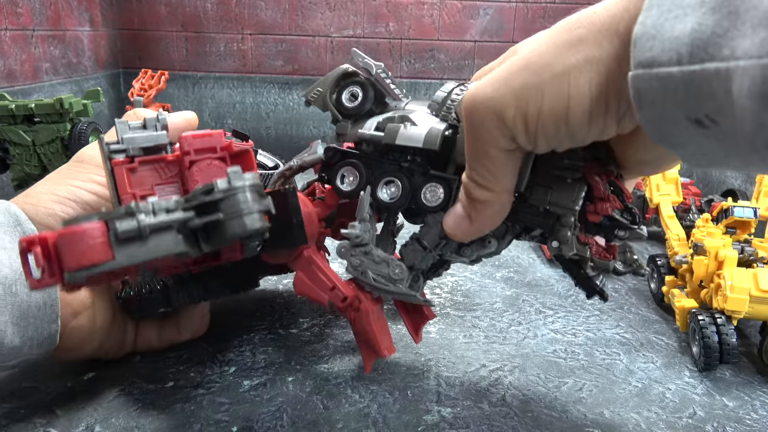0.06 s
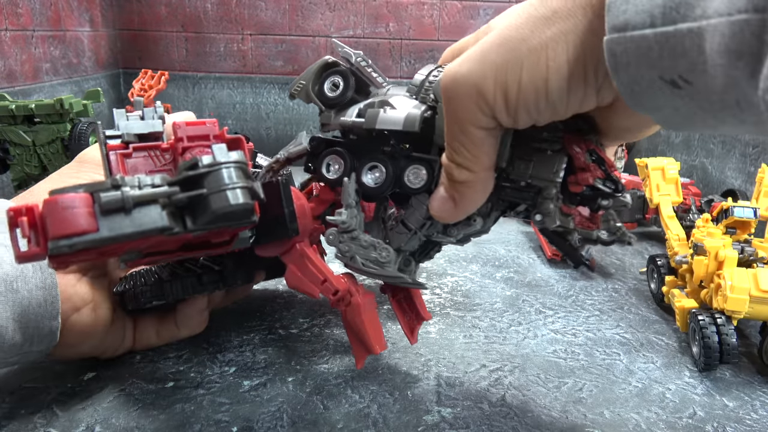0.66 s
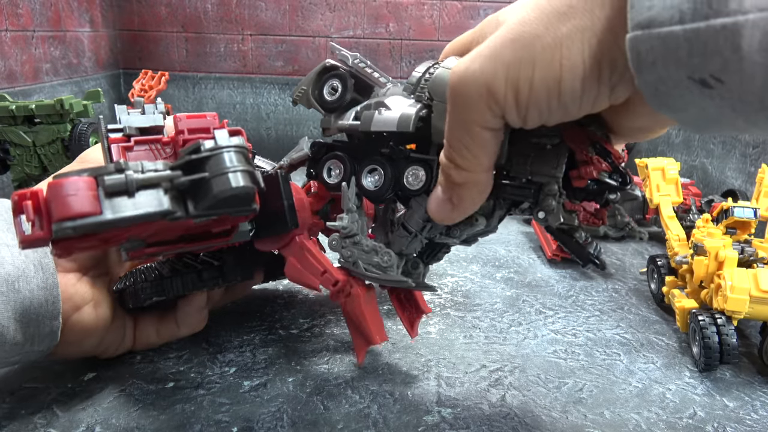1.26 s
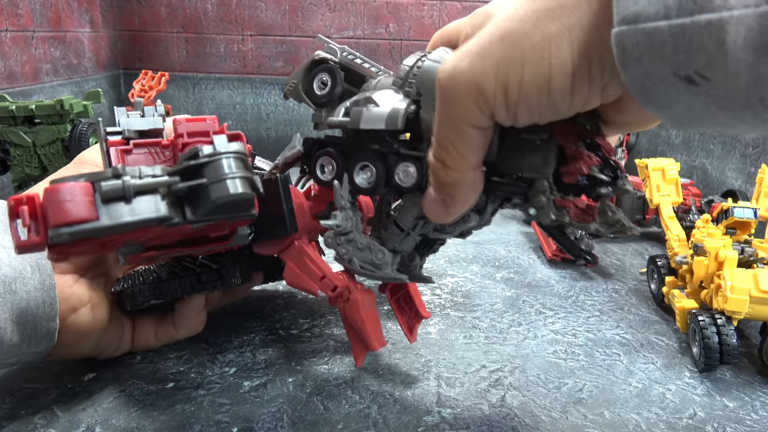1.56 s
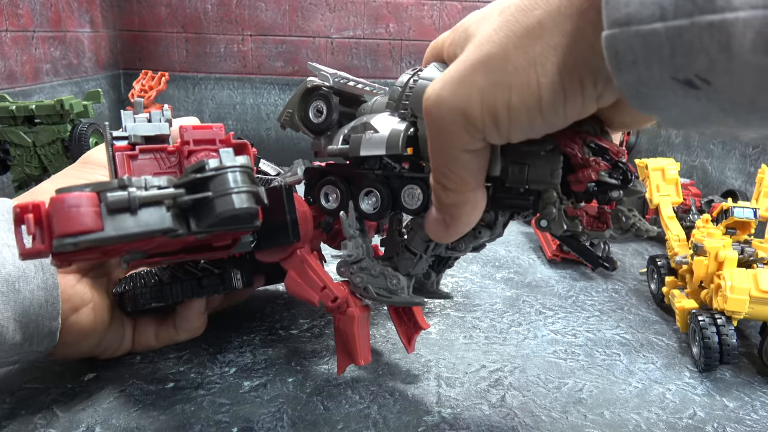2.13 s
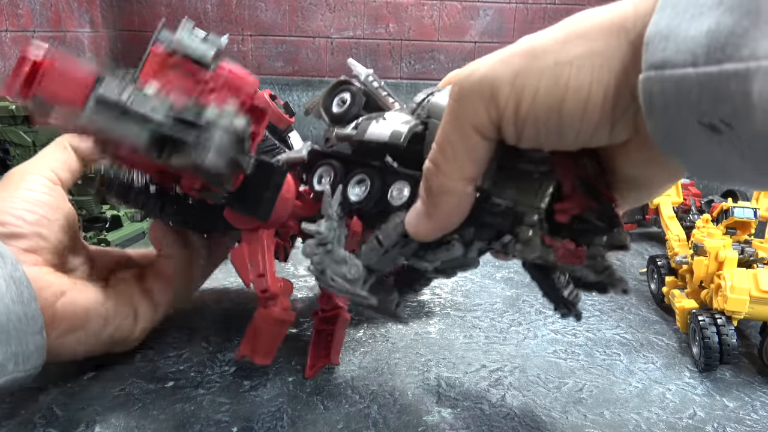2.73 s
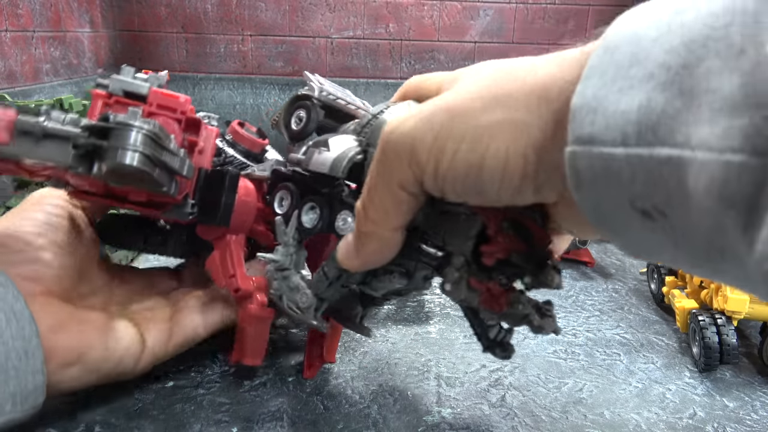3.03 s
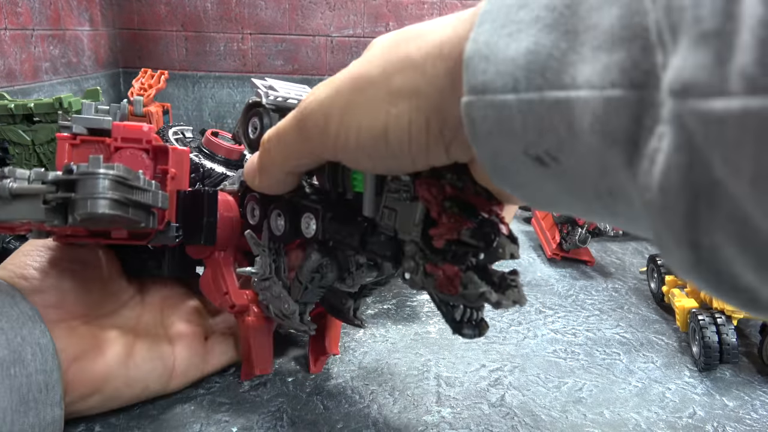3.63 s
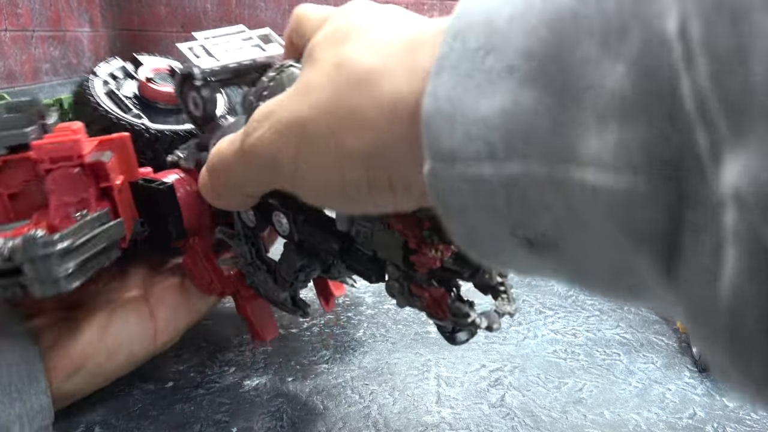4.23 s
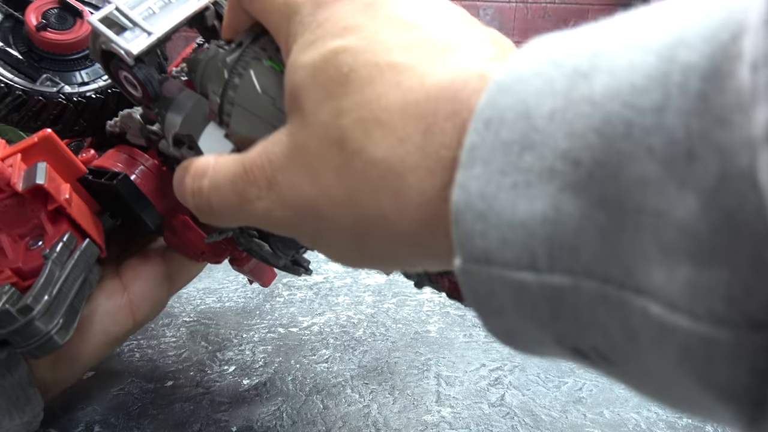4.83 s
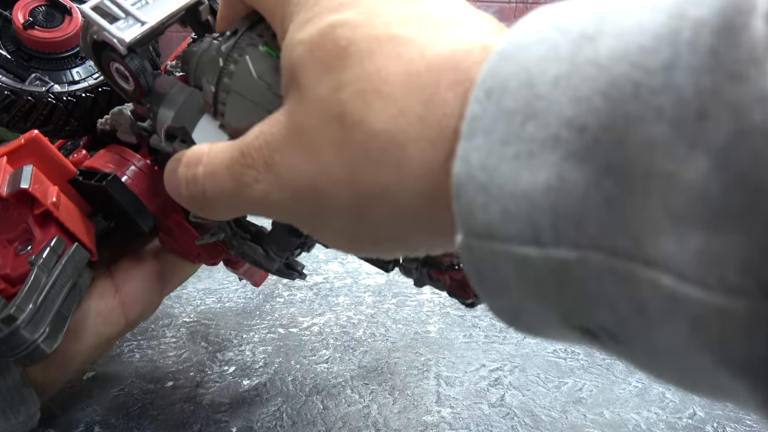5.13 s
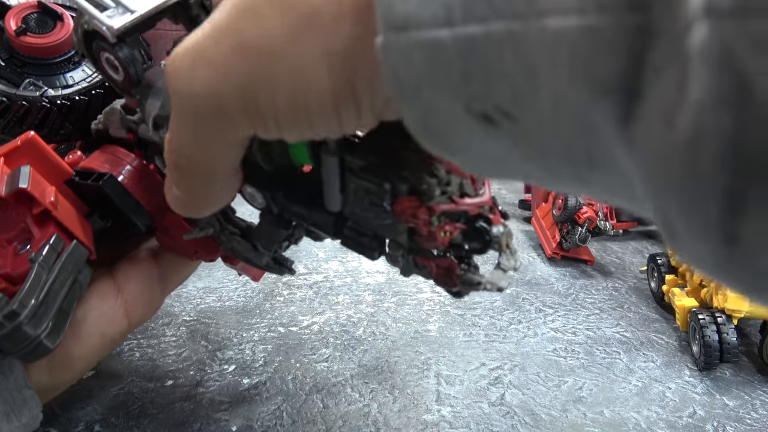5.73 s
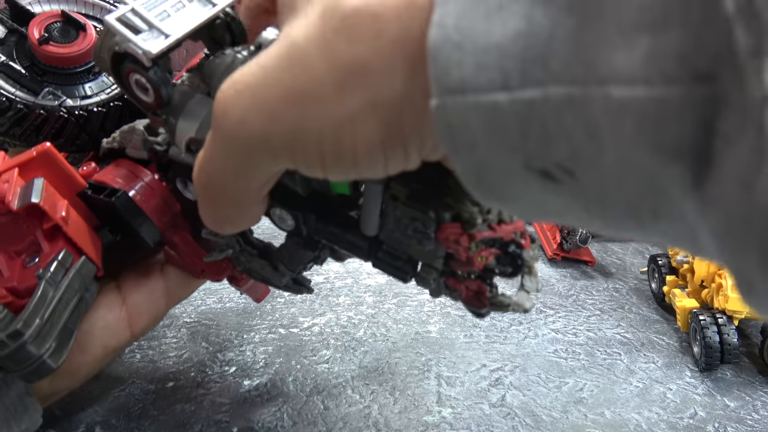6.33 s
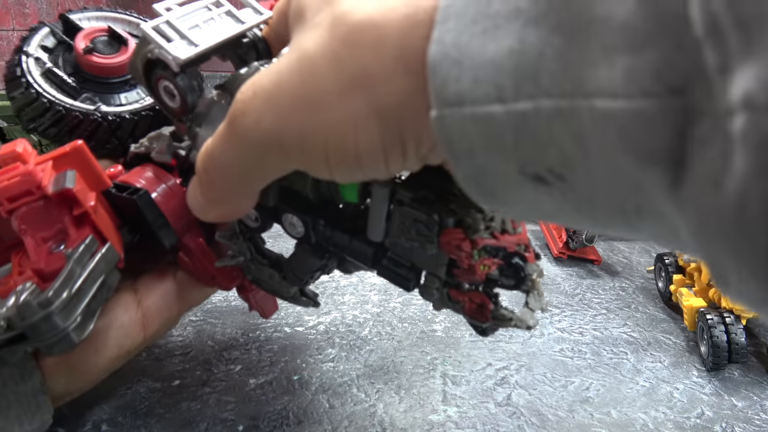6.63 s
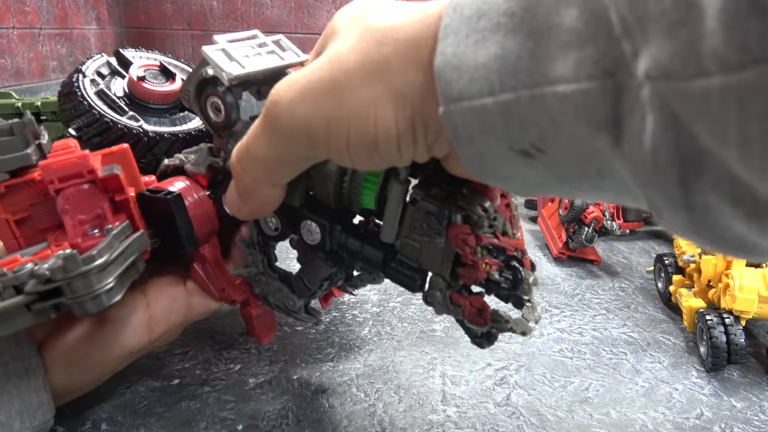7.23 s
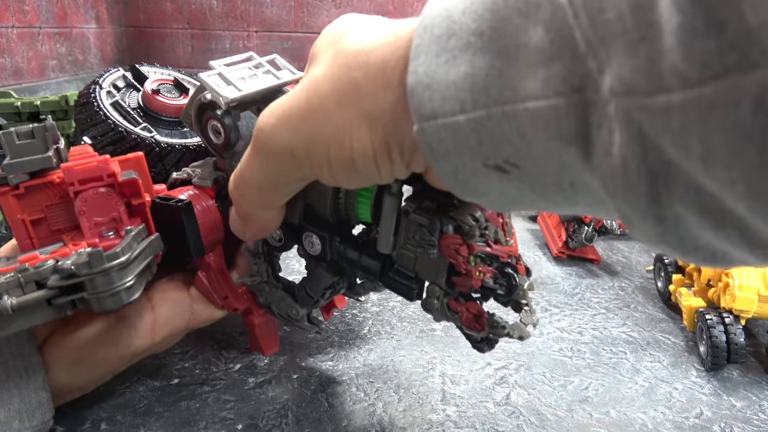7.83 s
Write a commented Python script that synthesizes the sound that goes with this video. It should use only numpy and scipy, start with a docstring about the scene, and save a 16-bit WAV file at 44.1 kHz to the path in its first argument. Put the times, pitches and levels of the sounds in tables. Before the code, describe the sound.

Two large hollow plastic toy figures are pushed together by hand over a table. A few light ticks and sharp joint snaps come first. Then a creaking, scraping clatter rises, with soft bumps of the bodies and a sleeve rustling. More snaps lead to a dense burst of bright clicks, followed by scattered ticks. The sound is close and slightly to the left, in a small room with a faint hum.

```python
"""Two large hollow plastic toy figures are pushed together by hand over a table in a small room.
Impacts excite their resonances: loose parts tick and rebound, stiff joints snap and rattle,
and the heavy bodies bump softly on table and palm. Stick-slip friction makes edges scrape and
pressed faces creak. Hands and a sleeve rustle over a faint room hum, and a close stereo
microphone hears the toys a little to its left."""
import sys
import numpy as np
from scipy import signal
from scipy.fft import rfft, irfft
from scipy.io import wavfile
from scipy.ndimage import uniform_filter1d

SR = 44100
rng = np.random.default_rng(int(sys.argv[2]) if len(sys.argv) > 2 else 0)


def wav_record(signal):
    """Record a signal, one row per channel, as 16-bit PCM in the file named by sys.argv[1]."""
    frames = np.transpose(np.atleast_2d(signal))
    bounded = np.clip(frames, -1, 1)
    # unit amplitude maps onto the largest positive 16-bit level
    quanta = np.round(bounded * 32767).astype(np.int16)
    wavfile.write(sys.argv[1], SR, quanta)


N = 351918

SIZE, TOP_HZ = 16384, 16000  # samples in one event; upper limit of the treble
TIME, AGE = np.arange(N) / SR, np.arange(SIZE) / SR  # seconds into the scene; into one event
SCENE_FREQS = np.fft.rfftfreq(N, 1 / SR)
EVENT_FREQS = np.maximum(np.fft.rfftfreq(SIZE, 1 / SR), 1)


def undb(db):
    """Amplitude ratio of a level in decibels."""
    return 10 ** (np.asarray(db) / 20)


def level(x, db, seconds=None):
    """Rms scaling: the opening seconds of a sound (or all of it) take the given level."""
    head = x if seconds is None else x[:int(seconds * SR)]
    return x * undb(db) / np.sqrt(np.mean(head ** 2) + 1e-20)


def fade(t60):
    """Exponential decay by 60 dB in t60 seconds."""
    return np.exp(-np.log(1000) * AGE / max(t60, 1e-3))


def follow(curve):
    """Amplitude envelope interpolated through rows of time_s, level_db."""
    return undb(np.interp(TIME, *np.transpose(curve)))


def colour_db(points, hz):
    """Spectral envelope interpolated on a log-frequency axis."""
    at_hz, db = np.transpose(points)
    return np.interp(np.log(np.maximum(hz, 1)), np.log(at_hz), db)


def peak(hz, width_hz):
    """Lorentzian resonance curve, 1 at its centre."""
    return 1 / (1 + (2 * (EVENT_FREQS - hz) / width_hz) ** 2)


def minimum_phase(x, gain_db):
    """Causal filtering: nothing sounds before the blow."""
    cepstrum = irfft(np.log(undb(gain_db)))
    cepstrum[1:SIZE // 2] *= 2
    cepstrum[SIZE // 2 + 1:] = 0
    return irfft(rfft(x, SIZE) * np.exp(rfft(cepstrum)))


def band(x, low_hz, high_hz):
    """Gentle Butterworth band-pass."""
    edges_hz = [low_hz, min(high_hz, SR / 2 - 1000)]
    return signal.sosfilt(signal.butter(2, edges_hz, "band", fs=SR, output="sos"), x)


def add(out, start_s, x):
    """Superposition: an event joins the mix at its start time."""
    i = max(int(start_s * SR), 0)
    out[i:i + SIZE] += x[:max(N - i, 0)]


def impulses(length, per_second, spread_db):
    """Poisson process: contacts at random moments, most small and a few large."""
    occurs = rng.random(length) < per_second / SR
    return occurs * undb(spread_db * np.clip(rng.standard_normal(length), -2, 2))


# Spectrum of a blow on plastic: frequency_hz, gain_db
PLASTIC_SPECTRUM = [(40, -15.5), (450, -4.5), (800, -9.5), (1150, -4.5), (3200, 0), (6300, -2.5),
                    (10000, -10.5), (16000, -26.5)]
# Resonances of the hollow shells: pitch_hz, width_hz, lift_db
SHELL_RESONANCES = [(1098, 57, 2), (1870, 670, 5), (3190, 230, 1)]
def part(ring_hz, tilt_db, crack_t60=0.014, ring_db=-12, lift_db=8, modes_db=-12):
    """Impulse response of a plastic part: a hard crack, a dense short ring and three damped modes."""
    dense = rng.standard_normal(SIZE) * (fade(crack_t60) + undb(ring_db) * fade(t60=0.11))
    octaves = np.log2(np.maximum(EVENT_FREQS, 1000) / 4000)
    gain_db = colour_db(PLASTIC_SPECTRUM, EVENT_FREQS) + tilt_db * octaves
    gain_db += lift_db * peak(ring_hz, width_hz=ring_hz / 5)
    gain_db += sum(lift * peak(hz, width) for hz, width, lift in SHELL_RESONANCES)
    # one mode on the ring pitch, two scattered around it
    modes_hz = np.minimum(ring_hz * np.exp(np.r_[0, .25 * rng.standard_normal(size=2)]), TOP_HZ)
    modes = np.sin(2 * np.pi * modes_hz[:, None] * AGE).sum(axis=0)
    modes *= fade(t60=65 / ring_hz)  # 65 cycles, so low parts ring longer
    return level(minimum_phase(dense, gain_db), 0) + level(modes, modes_db)


# Spectrum of the room hum: frequency_hz, relative_density_db
HUM_SPECTRUM = [(15, -10), (25, -1), (76, -32), (114, -7.5), (373, -11), (516, -6.5), (887, -16.5),
                (988, -7.5), (1260, -34), (11000, -23), (16000, -25)]
def hum(level_db=-63.5, side_share=0.7):
    """Stationary noise: a low room hum with a little hiss, partly correlated between the channels."""
    gain = undb(colour_db(HUM_SPECTRUM, SCENE_FREQS))
    mid, side = irfft(rfft(rng.standard_normal((2, N))) * gain, N)
    return level(np.array([mid + side_share * side, mid - side_share * side]), level_db)


# Sleeve and palms brushing the bodies: time_s, relative_level_db
SLEEVE_LEVELS = [(0, -58.5), (2.4, -57.5), (2.8, -49.5), (4.45, -47), (4.95, -56), (6.7, -51),
                 (7.98, -49.5)]
def sleeve(cloth_db=-3):
    """Friction noise: cloth brushes softly over the toys."""
    return follow(SLEEVE_LEVELS) * level(band(rng.standard_normal(N), 178, 1100), cloth_db)


def catching(per_second, spread_db=4):
    """Fluctuating friction: faces catch and let go, so the force moves in smoothed random steps."""
    hold = int(SR / per_second)
    steps = np.repeat(np.clip(rng.standard_normal(N // hold + 1), -2, 2), hold)
    return undb(spread_db * uniform_filter1d(steps, hold // 2)[:N])


def friction(force, per_second, spread_db=5):
    """Micro-slip: tiny releases between two faces excite the upper shell resonances."""
    out = np.zeros(N)
    for hz, _, _ in SHELL_RESONANCES[1:]:
        slips = force * impulses(N, per_second, spread_db)
        out += signal.oaconvolve(slips, part(hz, tilt_db=0, lift_db=1, modes_db=-24))[:N]
    return out


def grip(sliding, loose_db=-63, firm_db=-53.5, grasp_s=2.51, tighten_s=0.051):
    """Friction under load: the shells slip softly in the hands, louder once the grasp is firm."""
    hold = follow([(grasp_s, loose_db), (grasp_s + tighten_s, firm_db)])
    slip = friction(sliding * catching(per_second=7), per_second=360)
    return hold * level(slip, 0)


# Shifting of the heavy bodies: time_s, relative_level_db
RUMBLE_LEVELS = [(0, -70.5), (2.5, -68.5), (2.7, -49.5), (3.05, -45), (3.35, -57), (5.8, -67.5), (6.7, -61),
                 (7.98, -61)]
def rumble(sliding, gain_db=1):
    """Forced vibration: uneven sliding shakes the heavy bodies at low frequencies."""
    shaking = band(sliding * rng.standard_normal(N), 38, 124)
    return follow(RUMBLE_LEVELS) * level(shaking, gain_db)


def thud(hz, t60=0.072, rise_s=0.0012, scuff_t60=0.12, rub_db=-12):
    """Damped oscillation: a cushioned blow rocks the body, which scuffs and rubs as it settles."""
    tone = np.sin(2 * np.pi * hz * AGE) * fade(t60)
    contact = rng.standard_normal(SIZE) * fade(scuff_t60)
    scuff = level(band(contact, hz / np.sqrt(2), hz * np.sqrt(2)), 0)
    rub = level(band(contact, 2 * hz, 10 * hz), rub_db)
    return (level(tone, 0) + scuff + rub) * (1 - np.exp(-AGE / rise_s))


# Knocks of a whole toy on table and palm: start_s, level_db, pitch_hz
SOFT_KNOCKS = [(0.234, -48.5, 74.5), (2.638, -39.5, 180), (2.656, -43, 83), (2.785, -34, 191),
               (2.853, -41, 153), (3.074, -41, 153), (3.265, -37, 174), (3.338, -38, 420),
               (3.441, -41, 350), (3.813, -30, 363), (3.94, -38.5, 322), (3.998, -38, 327),
               (4.018, -37.5, 175), (4.109, -36, 344), (4.227, -41.5, 123), (6.638, -38.5, 398),
               (7.167, -39, 65.6)]
def bumps():
    """Soft impact: a cushioned contact puts its energy mainly into low frequencies."""
    out = np.zeros(N)
    for start_s, db, pitch_hz in SOFT_KNOCKS:
        add(out, start_s, level(thud(pitch_hz), db, seconds=0.02))
    return out


def brightness(ring_hz, neutral_hz=3280, tilt_per_octave_db=4.5):
    """Size scaling: smaller parts ring higher and click brighter; gives a tilt in dB per octave."""
    return tilt_per_octave_db * np.log2(ring_hz / neutral_hz)


# One loose part ticking against another: start_s, level_db, ring_hz
PART_TICKS = [(0.235, -49.5, 2790), (0.518, -50, 2140), (0.7402, -28, 3000), (0.908, -44, 2610),
              (0.944, -39.5, 2440), (1.0027, -36, 1570), (1.1187, -28, 6500), (1.259, -40, 2230),
              (1.4595, -29.5, 6400), (1.4678, -22, 5300), (1.653, -38, 1700), (1.8654, -40.5, 2530),
              (2.196, -43.5, 2620), (2.336, -49.5, 2780), (2.607, -31.5, 11500), (2.663, -26, 1650),
              (2.7295, -29.5, 3180), (2.8456, -24.5, 3170), (2.902, -20.5, 3550), (2.9359, -19, 3140),
              (2.9689, -19, 6400), (2.974, -18, 4070), (3.073, -29, 1350), (3.3768, -30, 1380),
              (3.812, -29, 1445), (3.9965, -26, 7200), (4.056, -30, 1830), (4.1125, -22.5, 3130),
              (4.148, -30.5, 2130), (4.326, -31, 2270), (4.3683, -29.5, 3400), (4.459, -32, 2600),
              (4.708, -37, 2120), (4.7734, -31, 2300), (4.8226, -23.5, 3280), (5.001, -23, 3600),
              (5.263, -30.5, 2490), (5.4647, -33.5, 2580), (5.497, -39, 2770), (5.571, -26.5, 7660),
              (5.7777, -29.5, 4500), (5.8542, -26.5, 5130), (5.8974, -22, 4140), (6.0202, -30.5, 3000),
              (6.087, -34.5, 2550), (6.14, -29.5, 3720), (6.1776, -21, 2870), (6.2432, -32, 3100),
              (6.31, -31, 3400), (6.3418, -17.5, 7500), (6.346, -29, 4100), (6.3764, -16, 8200),
              (6.4074, -26, 4400), (6.4178, -30, 3480), (6.426, -17.5, 6400), (6.43, -28, 3550),
              (6.4543, -20, 7500), (6.459, -26.5, 5730), (6.5343, -31, 4030), (6.557, -29.5, 2620),
              (6.615, -35.5, 2460), (6.6435, -20, 3990), (6.7393, -36, 4840), (6.838, -31, 1560),
              (6.85, -29.5, 3250), (6.894, -42, 6570), (6.9188, -31, 3260), (7.037, -40, 6860),
              (7.11, -23.5, 3180), (7.311, -25, 4330), (7.3579, -28, 2720), (7.3957, -29.5, 2830),
              (7.4248, -30.5, 9200), (7.5005, -28.5, 2260), (7.6741, -37, 1770), (7.7065, -30.5, 4120),
              (7.8721, -29.5, 1410), (7.946, -35.5, 2000)]
def clicks(rebounds=3, gap_s=0.004, rebound_db=-8):
    """Inelastic rebound: a part with play strikes, then bounces a few times, ever weaker."""
    out = np.zeros(N)
    for start_s, db, ring_hz in PART_TICKS:
        contacts = np.zeros(SIZE)
        contacts[0] = 1
        delays_s = np.cumsum(gap_s * (.5 + rng.random(rebounds)))
        contacts[(delays_s * SR).astype(int)] += undb(rebound_db * np.arange(1, rebounds + 1))
        ping_db = -11 + 3.5 * np.log2(3280 / ring_hz)  # large hollow parts ping more clearly
        response = part(ring_hz, brightness(ring_hz), crack_t60=0.013, ring_db=-13, modes_db=ping_db)
        click = signal.fftconvolve(contacts, response)[:SIZE]
        add(out, start_s, level(click, db, seconds=0.0039))
    return out


def chatter(force, ring_hz, tilt_db, per_second, spread_db, size_step=0.225):
    """Random impact excitation: three parts of neighbouring sizes are struck in step with the force."""
    out = np.zeros(SIZE)
    for hz in ring_hz * np.exp([-size_step, 0, size_step]):
        blows = force * impulses(SIZE, per_second, spread_db)
        out += signal.fftconvolve(blows, part(hz, tilt_db))[:SIZE]
    return out


def stick_slip(per_second, spread_db):
    """Relaxation oscillation: each contact loads for a random time, then lets go with uneven strength."""
    loading, strength = rng.random((SIZE // 16, 2)).T
    at = (np.cumsum(np.r_[0, 2 * loading[1:]]) * SR / per_second).astype(int)
    sizes = undb(spread_db * (2 * strength - 1))
    return np.bincount(at[at < SIZE], sizes[at < SIZE], SIZE)


# An edge juddering along another part: start_s, length_s, relative_level_db, ring_hz
EDGE_RUNS = [(0.73, 0.024, -34, 5070), (1.024, 0.026, -39.5, 2920), (1.076, 0.023, -24.5, 4300),
             (1.141, 0.032, -30, 2700), (1.443, 0.054, -30, 6200), (1.48, 0.042, -27, 3450),
             (1.528, 0.024, -28.5, 2350), (1.664, 0.013, -34.5, 4970), (1.703, 0.034, -19, 6000),
             (2.571, 0.016, -36, 9100), (2.725, 0.036, -28.5, 3070), (2.796, 0.05, -28.5, 4030),
             (2.906, 0.097, -24.5, 3270), (3.166, 0.03, -28, 2460), (3.343, 0.012, -29, 3400),
             (3.429, 0.065, -28.5, 3400), (3.998, 0.05, -40.5, 5000), (4.102, 0.048, -38.5, 1780),
             (5.047, 0.015, -23, 3800), (5.091, 0.024, -34.5, 4000), (5.267, 0.018, -32, 3280),
             (5.58, 0.023, -33, 3800), (5.632, 0.032, -37, 4600), (5.892, 0.0142, -30, 4800),
             (6.145, 0.026, -33, 2660), (6.386, 0.042, -31, 4180), (6.631, 0.063, -32, 2400),
             (6.78, 0.018, -34, 2530), (7.105, 0.03, -30.5, 4470), (7.184, 0.033, -30, 2870),
             (7.575, 0.033, -34.5, 2550), (7.847, 0.019, -32.5, 2940)]
def scrapes(easing=0.33, rise_s=0.0013, catches_per_s=170, catch_db=-6, grit_db=-4.5):
    """Stick-slip friction: an edge catches in clacks over a finer grit, easing as it slides home."""
    out = np.zeros(N)
    for start_s, length_s, db, ring_hz in EDGE_RUNS:
        force = (AGE < length_s) * (1 - easing * AGE / length_s) * (1 - np.exp(-AGE / rise_s))
        tilt_db = 0.44 * brightness(ring_hz)
        grit = chatter(force, ring_hz, tilt_db, per_second=690, spread_db=5.5)
        catches = force * stick_slip(catches_per_s, spread_db=2)
        clacks = signal.fftconvolve(catches, part(ring_hz, tilt_db))[:SIZE]
        add(out, start_s, level(grit, db + grit_db, length_s))
        add(out, start_s, level(clacks, db + catch_db, length_s + 1 / catches_per_s))
    return out


# Pushes that make two faces slide: start_s, length_s, relative_peak_db
FACE_PUSHES = [(0.777, 0.25, -53.5), (1.397, 0.21, -51), (2.44, 0.45, -29), (3.244, 0.16, -38),
               (5.223, 0.38, -41.5), (6.494, 0.2, -37.5), (7.2, 0.27, -47.5)]
def creaks(sliding, swell_power=1.49, release_s=0.11, creak_db=-2, hiss_db=-13):
    """Friction under rising load: pressed faces creak and hiss ever harder until the push lets go."""
    push = np.zeros(N)
    for start_s, length_s, db in FACE_PUSHES:
        swell = np.clip((TIME - start_s) / length_s, 0, 1) ** swell_power
        release = np.exp(-np.maximum(TIME - start_s - length_s, 0) / release_s)
        push += undb(db) * swell * release
    creak = friction(sliding, per_second=140)
    hiss = band(sliding * rng.standard_normal(N), 6000, 15000)
    return push * (level(creak, creak_db) + level(hiss, hiss_db))


# Stiff joints snapping over: start_s, relative_level_db, ring_hz, rattle_t60_s
JOINT_SNAPS = [(1.0652, -22.5, 6000, 0.087), (1.6785, -21, 3350, 0.23), (3.7585, -30, 4920, 0.028),
               (4.5158, -29, 6330, 0.048), (5.0407, -18.5, 3930, 0.17), (5.9477, -21.5, 4100, 0.12),
               (6.1938, -18, 5530, 0.092), (7.1604, -22, 1660, 0.075), (7.595, -30, 2200, 0.061)]
def snaps(rub_s=0.0068, rub_db=-11, crack_db=-0.5, rattle_db=-4, body_db=-24, tilt_db=1.5):
    """Snap-through: a joint rubs, then lets go in one blow that shakes the body and its loose parts."""
    out = np.zeros(N)
    for start_s, db, ring_hz, t60 in JOINT_SNAPS:
        rub = chatter(AGE * (AGE < rub_s), ring_hz, tilt_db, per_second=3500, spread_db=10)
        crack = part(ring_hz, tilt_db)
        rattle = chatter(fade(t60), ring_hz, tilt_db, per_second=780, spread_db=3.5)
        body = thud(hz=300 * np.exp(.3 * rng.standard_normal()))
        add(out, start_s - rub_s, level(rub, db + rub_db, rub_s))
        add(out, start_s, level(crack, db + crack_db, seconds=0.012))
        add(out, start_s, level(rattle, db + rattle_db, seconds=0.037))
        add(out, start_s, level(body, db + body_db, seconds=0.0047))
    return out


# Modes of the hollow bodies: pitch_hz, gain_db
HOLLOW_MODES = [(168, -2.5), (306, 0), (1120, -5), (3040, -2.5), (3320, -8), (4118, -6), (6120, -4)]
def bodies(contacts, t60=0.084, drift=0.013):
    """Sympathetic resonance: contacts ring the body modes, whose pitch wanders as the grip changes."""
    pole = np.exp(-np.log(1000) / (t60 * SR))
    seconds = np.arange(N // SR + 2)
    out = contacts.copy()
    for hz, db in HOLLOW_MODES:
        wander = np.interp(TIME, seconds, rng.standard_normal(len(seconds)))
        pitch_hz = hz * (1 + drift * wander)
        phasor = np.exp(2j * np.pi * np.cumsum(pitch_hz) / SR)
        amplitude = signal.lfilter([1 - pole], [1, -pole], contacts * phasor.conj())
        out += 2 * undb(db) * np.real(phasor * amplitude)
    return out


# Room echo by band: low_hz, high_hz, t60_s, gain_db
ECHO_BANDS = [(60.7, 576, 0.63, -12), (970, 4300, 0.26, -15.5), (4700, 13000, 0.2, -33)]
def room(direct, first_echo_s=0.0042, side_share=.4):
    """Reverberation: table and walls return a short wash, nearly alike at two close microphone ports."""
    echo = np.zeros((2, SIZE))
    for low_hz, high_hz, t60, db in ECHO_BANDS:
        mid, side = rng.standard_normal((2, SIZE))
        decay = fade(t60) * (AGE > first_echo_s)
        wash = np.array([mid + side_share * side, mid - side_share * side]) * decay
        echo += undb(db) * band(wash / np.linalg.norm(decay), low_hz, high_hz)
    return direct + signal.fftconvolve(direct[None], echo, axes=1)[:, :N]


# Position of the working joints: time_s, leftward_fraction (0 middle, 1 left)
TOY_PATH = [(1.8, .2), (3.6, 0.44), (6.3, 0.6), (7.2, 0.46)]
# Port balance for a sound on the left: frequency_hz, left_minus_right_db
PORT_BALANCE = [(50, -4), (200, 15), (1000, 5), (4000, 6.5), (12000, 5.5)]
def ports(pair, scatter_db=-21, scatter_t60=0.03):
    """Level difference between the ports places the toys; the hands scatter treble unequally to each."""
    leftward = np.interp(TIME, *np.transpose(TOY_PATH))
    ratio = undb(colour_db(PORT_BALANCE, SCENE_FREQS))
    mid = pair.mean(axis=0)
    scatter = rng.standard_normal(SIZE) * fade(scatter_t60)
    scatter = undb(scatter_db) * band(scatter / np.linalg.norm(scatter), 2000, 16000)
    side = leftward * irfft(rfft(mid) * (ratio - 1) / (ratio + 1), N)
    side += signal.oaconvolve(mid, scatter)[:N]
    return pair + np.array([side, -side])


def scene():
    """Source, resonator and path: contacts ring the hollow toys, which sound in the humming room."""
    impacts = clicks() + snaps() + scrapes() + bumps()
    sliding = catching(per_second=30)  # one uneven force drives grip, creaks and rumble
    rubbing = grip(sliding) + creaks(sliding) + rumble(sliding)
    toys = bodies(impacts + rubbing) + sleeve()
    return ports(room(toys)) + hum()


def record(dry, ceiling=.75):
    """Soft saturation rounds the sharpest peaks, and a steep low-pass cuts the top of the treble."""
    low_pass = signal.ellip(10, .2, 80, TOP_HZ, fs=SR, output="sos")
    return signal.sosfilt(low_pass, ceiling * np.tanh(dry / ceiling))


dry = scene()
out = record(dry)
wav_record(out)
```